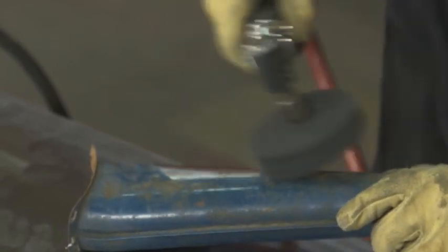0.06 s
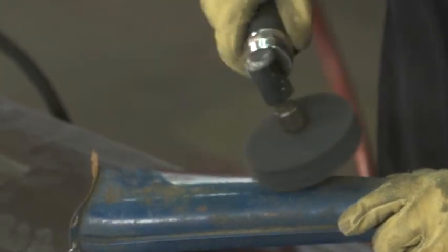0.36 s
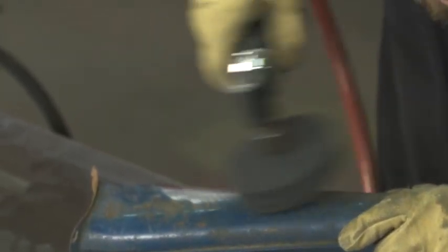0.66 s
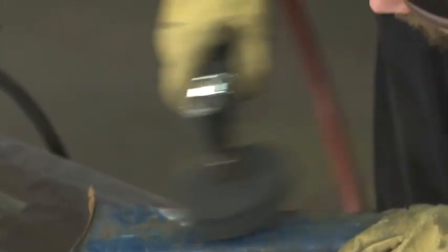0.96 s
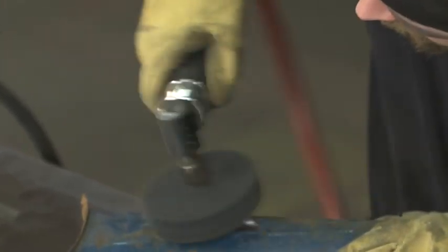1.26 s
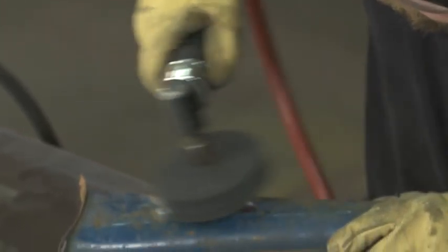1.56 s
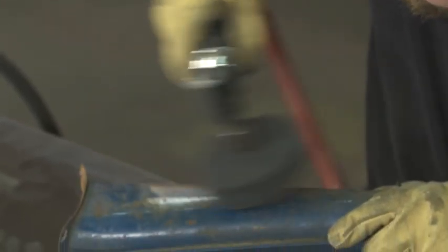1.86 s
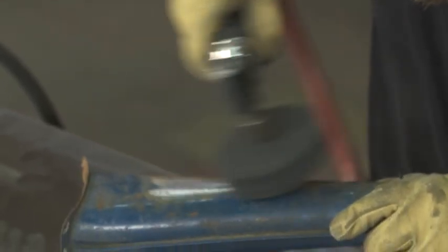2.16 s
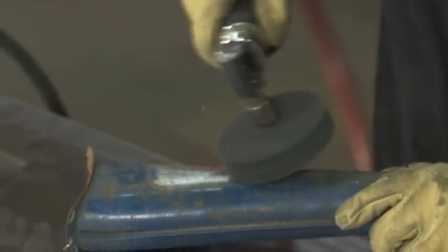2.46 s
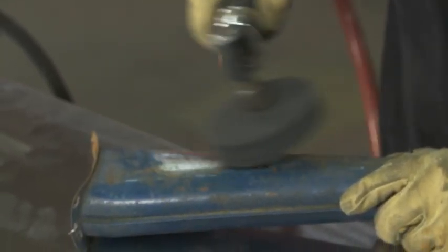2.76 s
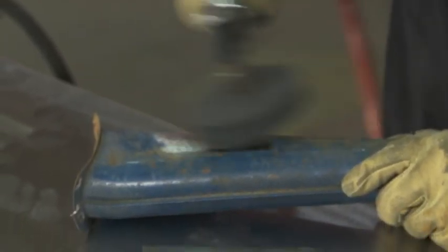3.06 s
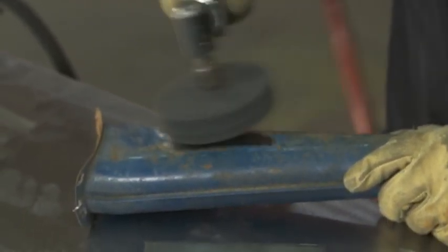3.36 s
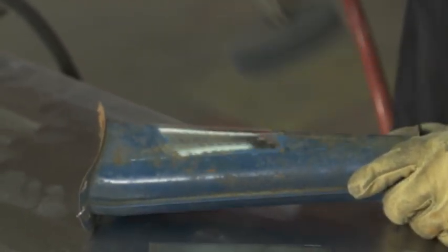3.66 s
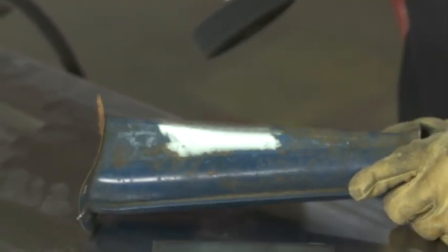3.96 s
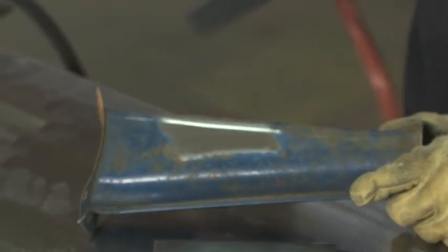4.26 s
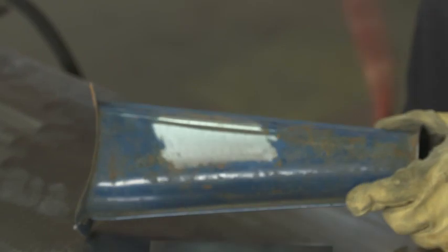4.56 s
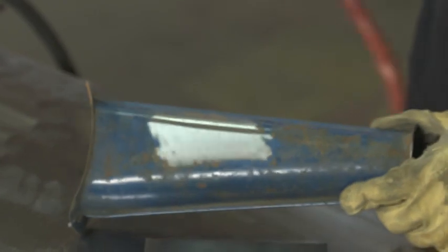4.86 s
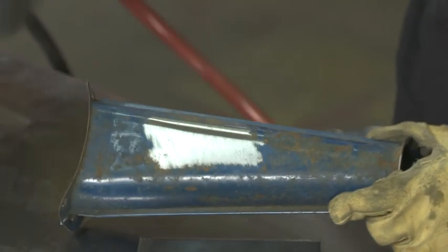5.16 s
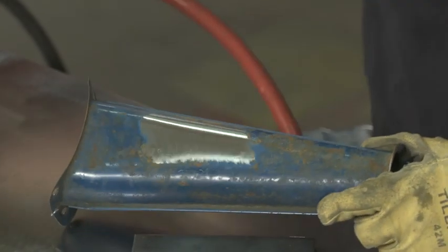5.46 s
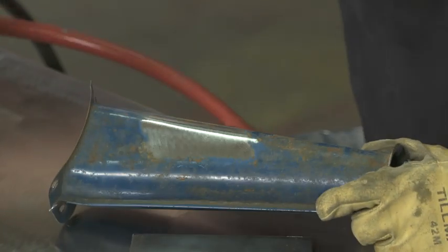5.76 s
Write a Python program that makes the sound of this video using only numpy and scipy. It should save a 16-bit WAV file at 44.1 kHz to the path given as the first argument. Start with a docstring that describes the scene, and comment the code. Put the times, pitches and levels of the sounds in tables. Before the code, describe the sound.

A pneumatic grinding disc rasps back and forth on hollow steel, then shuts off and coasts down, whirring and ticking.

```python
"""In a workshop, an air grinder strokes a stripping disc to and fro over a hollow sheet-steel part.
The disc's rim rubs the same bumps over the steel on every turn, so the steel rings, rasps and squeals.
The motor's vanes (small sliding blades) chop the air into a whine, and the used air hisses out.
The disc lifts, the trigger shuts the air, and the motor coasts down until its loose vanes flop one by one."""
import sys
import numpy as np
from scipy import signal
from scipy.fft import rfft, irfft, next_fast_len
from scipy.io import wavfile
from scipy.ndimage import uniform_filter1d

SR = 44100
rng = np.random.default_rng(int(sys.argv[2]) if len(sys.argv) > 2 else 0)


def generate_wav(sig):
    """Save sig (samples, or channels by samples) to the path in sys.argv[1] as 16-bit PCM at SR."""
    pcm = np.round(np.clip(np.atleast_2d(sig).T, -1, 1) * 32767).astype(np.int16)
    wavfile.write(sys.argv[1], SR, pcm)


N = 265921
T = np.arange(N) / SR
HZ = np.maximum(np.fft.rfftfreq(N, 1 / SR), 1)

# Levels in the tables are relative: the functions add their own gains.
# tone colours of the noises: f/Hz, level/dB
ROOM_COLOUR = [(15, -38.5), (25, 3.5), (394, -10), (462, 0), (978, -10), (1420, -4.5), (1630, -9),
               (4500, -21), (5420, -67.5), (11200, -22.5), (15000, -34)]  # the quiet workshop
HISS_COLOUR = [(2650, -55.5), (4500, -35), (5850, -1), (7000, 2), (7690, 4.5), (9590, -0.5), (12700, 5),
               (15100, 1), (15800, -15.5)]  # air leaving the motor
RUSH_COLOUR = [(25, -10.5), (100, -11.5), (300, -11.5), (520, -5), (720, -8.5), (1100, -2.5), (2500, -2),
               (4000, -4.5), (5000, -4), (7000, -13)]  # broad rush of air and scouring grit
LAST_AIR_COLOUR = [(2350, -26), (4000, -8), (5330, -22), (6710, -22), (7400, -11), (9150, -12), (11200, -4),
                   (12600, -8), (13700, -12), (15800, -19)]  # the last air leaking out
VANE_RUB_COLOUR = [(190, -19.5), (330, -9.5), (359, -7), (421, -13.5), (511, 0), (563, -1), (762, -14.5),
                   (1300, -7), (1850, -13.5), (2690, -11.5), (3310, -18), (5310, -18), (6000, -21.5),
                   (7800, -27), (13200, -120)]  # vanes rubbing the housing
BEARING_COLOUR = [(2940, -34), (5000, -18), (5890, 0), (6390, 1), (7000, 5.5), (7900, 3.5), (9620, -5),
                  (11000, 0), (13300, -13), (14900, -18), (15800, -23)]  # fizzing bearings
KNOCK_COLOUR = [(120, -43), (200, -8), (215, -11), (402, -8), (463, -2), (490, 1), (670, -6), (1530, -11.5),
                (1620, -17), (2380, -20.5), (3250, -25), (4710, -27.5), (6000, -36), (7800, -56),
                (13200, -120)]  # the low part of a vane's flop
VANE_TICK_COLOUR = [(2650, -43), (4500, -9), (6040, -17), (6740, -3), (7850, 1), (9440, -9), (11100, 6),
                    (12800, -10), (15800, -25)]  # its high part
# dry scrapes as the tool runs down: middle t/s, length/s, f/Hz, width/Hz, level/dB
DRY_SCRAPES = [(4.662, 0.044, 3827, 4000, -52.5), (4.82, .25, 3700, 1216, -59),
               (5.168, .3, 3780, 1390, -65.5), (5.384, 0.12, 3170, 700, -60.5),
               (5.524, 0.014, 5140, 2500, -54), (5.547, 0.0097, 8200, 4950, -53)]
# single vane flops, the hard ones and the last slow ones: t/s, level/dB, treble/dB
VANE_FLOPS = [(4.514, -39, -22), (4.6, -31, -14), (4.825, -42, 1), (4.95, -42, 7), (5.025, -49, 14),
              (5.401, -38, -18), (5.434, -39, -18), (5.497, -35.5, -11), (5.562, -37.5, -7),
              (5.594, -41, -5), (5.637, -40.5, -11), (5.662, -38, -2), (5.7, -38, -18), (5.77, -38, -28),
              (5.84, -40, -8), (5.887, -38, 0.5), (5.914, -42, -19), (5.99, -40, -18), (6.018, -37, -3)]
# strength of the exhaust hiss: t/s, level/dB
HISS_LEVEL = [(0, -24.5), (.8, -26.5), (1.5, -27), (2.3, -26), (3.64, -27.5)]
# the motor's weaker overtones: multiple of the vane rate, level/dB
OVERTONES = [(3, -6.5), (4, -2.5), (5, -3.5), (6, -2.5), (7, -7.5), (8, -13.5), (9, -6), (11, -10.5)]
# shake of the unbalanced disc: multiple of the spin rate, level/dB
DISC_SHAKE = [(1, -7), (2, 0), (3, -4.5), (6, -5.5), (7, -1.5)]
# turns per second, dropping as the hand leans on the tool: t/s, f/Hz
SPIN_RATE = [(0.0, 108.6), (0.19, 109.6), (0.49, 113.7), (0.79, 105.7), (0.92, 103.2), (1.0, 102.1),
             (1.16, 97.64), (1.34, 95.75), (1.44, 99.75), (1.62, 105.4), (1.86, 111.1), (2.08, 108.1),
             (2.38, 107.2), (2.58, 109.1), (2.83, 107.1), (3.06, 102), (3.35, 97.9), (3.6, 98.74)]
# each stroke lingers at the part's hollow end, which rings and drones:
# t/s, stay/s, ring at the end/dB, ring in between/dB, drone/dB, extra clang/dB, extra rasp and shrill/dB
HAND_STROKES = [(0.081, 0.11, -34.5, -23, -33, -1.0, -1), (0.37, 0.19, -18.5, -28.5, -32.5, -2, 0),
                (0.625, 0.11, -21, -20.5, -32, -1.0, -0.5), (0.895, 0.069, -17.5, -17, -29.5, -1.0, -2),
                (1.153, 0.119, -22, -23.5, -33.5, -1, -3), (1.413, 0.094, -18.5, -25.5, -30.5, 0.5, -1.5),
                (1.669, 0.12, -13.5, -14, -30.5, 0, 1.0), (1.921, 0.16, -9.5, -26.5, -26.5, -2, 0.5),
                (2.205, 0.13, -14, -13, -28.5, 0, -1), (2.485, 0.16, -13.5, -21, -27.5, -0.0, 1),
                (2.735, 0.15, -15, -17.5, -29.5, -1.5, -1), (2.992, 0.13, -13.5, -18.5, -32.5, 1.5, 0.5),
                (3.261, 0.11, -15, -22, -30.5, 0.5, -1), (3.514, 0.083, -16.5, -28, -31.5, 1.5, 0)]
# the rim catches and the steel sings one note: middle t/s, length/s, f/Hz, level/dB
RIM_SQUEALS = [(0.042, 0.048, 3840, -26), (.17, 0.38, 2520, -27), (0.66, .06, 2513, -25),
               (0.96, .07, 2250, -22.5), (1.236, 0.052, 3780, -27), (0.477, 0.11, 4040, -29),
               (1.806, 0.13, 2525, -24), (1.987, 0.052, 2523, -22), (2.273, 0.048, 2530, -22.5),
               (2.82, 0.027, 3800, -22), (2.887, 0.05, 3758, -28), (3.2, 0.026, 3807, -24.5),
               (3.34, 0.042, 3733, -23.5), (3.412, 0.076, 1752, -22), (3.45, 0.059, 3716, -25.5),
               (3.53, 0.055, 4490, -30.5), (3.579, 0.031, 3740, -21)]
# the steel's modes (the pitches it likes to ring at), low to high: f/Hz, width/Hz, level/dB
RING_MODES = [(851.6, 52, 0.5), (982, 34, -3.5), (1086, 85, 3), (1213, 106, -13)]
CLANG_MODES = [(1427, 160, 1), (1735, 495, -3.5)]
RASP_MODES = [(2221, 160, -1.5), (2360, 190, -9), (2509, 98, -4.5), (2800, 270, -4), (3183, 520, -14.5)]
SHRILL_MODES = [(3800, 400, 2), (4130, 1500, -5)]

LIFT_S, SHUT_S = 3.61, 3.662  # the disc leaves the steel; the trigger shuts the air
FREE_HZ, VANE_MULTIPLE = 105.5, 5.2  # spin rate just after the lift; vane pulses per turn


def undb(db):
    """Turn decibels into a gain."""
    return 10 ** (np.asarray(db) / 20)


def unit(x):
    """Scale to an average strength (rms) of 1."""
    return x / np.sqrt(np.mean(x ** 2))


def curves(table):
    """The columns of a timed table, one value per sample."""
    s, *columns = np.transpose(table)
    return [np.interp(T, s, c) for c in columns]


def noise():
    """White noise."""
    return rng.standard_normal(N)


def grit(spread_db):
    """Gritty noise: many tiny grains, a few much louder than the rest."""
    return unit(noise() * undb(spread_db * np.minimum(rng.exponential(size=N), 8)))


def walk(rate):
    """A random wander of size about 1, changing course rate times a second."""
    steps = rng.standard_normal(2048)
    return 1.248 * np.interp(T * rate, np.arange(len(steps)), steps)


def until(s, fade_s):
    """Stay at 1 until time s, then die away."""
    return np.exp(-np.maximum(T - s, 0) / fade_s)


def swell(s, length_s):
    """A flat-topped swell around time s."""
    return np.exp(-np.minimum(np.abs(2 * (T - s) / length_s), 5) ** 4)


def shape(x, gain):
    """Filter with a gain for each frequency, ringing only after a sound and never before it."""
    log_gain = np.interp(np.fft.rfftfreq(8192, 1 / SR), HZ, np.log(gain + 1e-5))
    fold = np.r_[1, np.full(4095, 2), 1, np.zeros(4095)]
    response = irfft(np.exp(rfft(irfft(log_gain) * fold)))[:4096]
    return signal.oaconvolve(x, response)[:N]


def colour(x, points):
    """Give a sound the tone colour in a table, at strength 1."""
    hz, db = np.transpose(points)
    return unit(shape(x, undb(np.interp(np.log(HZ), np.log(hz), db))))


def band(x, hz, width):
    """One resonance, with gain 1 at its centre."""
    return shape(x, 1 / np.hypot(1, (HZ ** 2 - hz ** 2) / (HZ * width)))


def resonate(x, modes):
    """Ring a set of modes and hold the result at an even level."""
    gain = sum(undb(db) / (1 + ((HZ ** 2 - hz ** 2) / (HZ * width)) ** 2) for hz, width, db in modes)
    ringing = shape(x, gain)
    return ringing / np.sqrt(uniform_filter1d(ringing ** 2, size=2600) + 1e-12)


def cavity(hz, centre_hz=502.4, half_width_hz=23):
    """How near a tone is (0-1) to the pitch that the air in the hollow part boosts."""
    return 1 / (1 + ((hz - centre_hz) / half_width_hz) ** 2)


def at_hollow_end():
    """How near the disc is (0-1) to the hollow end of its stroke."""
    return np.minimum(sum(swell(s, stay_s) for s, stay_s, *_ in HAND_STROKES), 1)


def stroke_angle():
    """The hand's to and fro in radians, one cycle per stroke."""
    return 2 * np.pi * np.interp(T, [row[0] for row in HAND_STROKES], np.arange(len(HAND_STROKES)))


def spin_hz(sway_hz=0.542, run_up_s=.018, coast_from_s=3.645, slowing_s=.59):
    """Turns per second: held back by the work, freed by the lift, then slowed ever more gently by drag."""
    working = curves(SPIN_RATE)[0] + sway_hz * np.sin(stroke_angle())
    free = FREE_HZ / (1 + np.maximum(T - coast_from_s, 0) / slowing_s) ** 1.4
    lifted = np.clip((T - LIFT_S) / run_up_s + .5, 0, 1)
    return working + (free - working) * lifted


def room_tone(level_db=-60.5):
    """The quiet, steady noise of the workshop."""
    return undb(level_db) * colour(noise(), ROOM_COLOUR)


def wall_echo(x, echo_db=-19, decay_s=.5):
    """The walls send back a short, faint tail."""
    tail = (noise() * undb(-60 * T / decay_s) * (T > .006))[:SR]
    return undb(echo_db) * signal.fftconvolve(x, tail / np.linalg.norm(tail))[:N]


def scrapes():
    """Dry metal rubs briefly as the tool runs down."""
    return sum(undb(db) * swell(s, length) * resonate(grit(spread_db=6.5), [(hz, width, 0)])
               for s, length, hz, width, db in DRY_SCRAPES)


def rattle(start_s=4.76, gap_s=.0212, stretch_s=.000346, count=25, treble_db=-13):
    """Loose vanes rattle ever more slowly as the motor slows. Rows: t/s, level/dB, treble/dB."""
    k = np.arange(count)
    ages = k * (gap_s + stretch_s * k / 2)
    levels = -38 - 0.8 * ages + 0.2 * rng.standard_normal(count)
    return [(start_s + age, db, treble_db) for age, db in zip(ages, levels)]


def flops(knock_db=-4, tick_db=-11, rise_s=0.0012, knock_s=0.0067, tick_s=0.0087):
    """Each loose vane slides out and hits the housing with a short, gritty knock."""
    knock, tick = np.zeros(N), np.zeros(N)
    for s, db, treble_db in rattle() + list(VANE_FLOPS):
        span = slice(int(s * SR), int(s * SR) + SR // 10)
        age = T[span] - T[span][0]
        landing = undb(db) * (1 - np.exp(-age / rise_s))
        knock[span] += landing * undb(knock_db) * np.exp(-age / knock_s)
        tick[span] += landing * undb(treble_db + tick_db) * np.exp(-age / tick_s)
    return knock * colour(noise(), KNOCK_COLOUR) + tick * colour(grit(spread_db=5.5), VANE_TICK_COLOUR)


def housing_bumps(rotor, size=256):
    """The vanes pass the same rough wall on every turn; the pattern shifts as they settle."""
    place = rotor / (2 * np.pi) % 1 * size
    shares = [walk(7) for _ in range(3)]
    bumps = sum(share * np.interp(place, np.arange(size), rng.standard_normal(size)) for share in shares)
    return unit(bumps / np.linalg.norm(shares, axis=0))


def coasting(angle, rub_db=-33, fizz_db=-47, leak_db=-51):
    """With the trigger shut, the last air leaks out, the vanes rub and the bearings fizz, all fading."""
    rotor = VANE_MULTIPLE * angle / 5
    age = np.maximum(T - SHUT_S, 0)
    whirr = undb(1) * colour(housing_bumps(rotor), VANE_RUB_COLOUR) * until(4.54, 0.25)
    dry_rub = colour(grit(spread_db=3), VANE_RUB_COLOUR)
    rub = undb(rub_db - 18 * age) * (whirr + dry_rub)
    leaking = until(4.29, 0.091)
    leak = undb(leak_db) * leaking * colour(noise(), LAST_AIR_COLOUR)
    fizz_gain = undb(fizz_db - 14 * age + 0.5 * walk(60)) * (1 - leaking)
    fizz = fizz_gain * colour(grit(spread_db=3.5), BEARING_COLOUR)
    throb = 1 + 0.28 * np.cos(2 * rotor)
    return (throb * (rub + fizz) + leak) * (1 - until(SHUT_S, 0.0055))


def exhaust(angle, at_end, rush_db=-25, stereo_db=-21, chop=0.12):
    """Air spits out, pulsed by the vanes, over a broad scouring rush; the trigger cuts both off."""
    flow_db = curves(HISS_LEVEL)[0] - 2 * at_end + 0.7 * walk(170)
    flow = undb(flow_db) * (1 + chop * np.cos(VANE_MULTIPLE * angle)) * until(SHUT_S, 0.0019)
    hiss = colour(grit(spread_db=2), HISS_COLOUR)
    # the treble dips a little at the hollow end of each stroke
    hiss = unit(hiss - 0.052 * (2 * at_end - 1) * band(hiss, hz=9150, width=2700))
    stereo = undb(stereo_db) * colour(noise(), HISS_COLOUR) * np.array([[1], [-1]])
    rush = undb(rush_db + walk(25.07)) * colour(noise(), RUSH_COLOUR) * until(SHUT_S, .009)
    return flow * (hiss + stereo) + rush


def motor(angle, speed, whistle_db=-43, jitter_rad=.5):
    """The vanes chop the air into a whine that falls and fades as the motor coasts."""
    vane, vane_hz = VANE_MULTIPLE * angle, VANE_MULTIPLE * speed
    on_steel, air_on = until(LIFT_S, 0.015), until(SHUT_S, 0.0039)
    octaves = (1 - on_steel) * np.log2(speed / FREE_HZ)  # goes below zero as the motor slows
    driven_db = -28 + 5.5 * cavity(vane_hz) + 2.1 * walk(11)
    coasting_db = -18 + 18 * octaves + 6.5 * cavity(vane_hz)
    first = undb(air_on * driven_db + (1 - air_on) * coasting_db) * np.sin(vane) * until(4.44, 0.17)
    second = undb(-27 + 11 * octaves + 6.5 * cavity(2 * vane_hz)) * np.sin(2 * vane)
    overtones = sum(undb(db + 2.5 * walk(40)) * np.sin(k * vane + jitter_rad * walk(130))
                    for k, db in OVERTONES)
    overtones *= undb(-40 + 9 * octaves)
    # the housing whistles as one high overtone slides through its resonance
    whistle = undb(whistle_db) * band(np.sin(9 * vane + jitter_rad * walk(130)), hz=2830, width=220)
    upper = undb(5 * air_on - 12 * on_steel) * (second + overtones + whistle) * until(4.41, .22)
    return np.sqrt(2) * (first * (1 + 0.24 * walk(70)) + upper * (1 + .15 * walk(90)))


def disc(angle, speed, at_end, between_db=-42, cavity_db=15):
    """The unbalanced disc hums, louder with speed; its lobes, four and five a turn, drone on the steel."""
    hum_db = -38.5 - 5 * at_end + 26 * np.log2(speed / FREE_HZ)
    hum = sum(undb(hum_db + db + 2 * walk(12)) * np.sin(k * angle + rng.uniform(0, 2 * np.pi))
              for k, db in DISC_SHAKE)
    _, _, _, end_db, _, _ = curves(HAND_STROKES)
    drone_db = at_end * end_db + (1 - at_end) * between_db
    four = undb(drone_db + 1) * np.sin(4 * angle + .3 * walk(14))
    five = undb(drone_db - 7 + cavity_db * cavity(5 * speed)) * np.sin(5 * angle + .5 * walk(14))
    return np.sqrt(2) * (hum + (four + five) * until(LIFT_S, 0.013))


def squeals(angle, throb=.35, waver_rad=.45):
    """The rim sticks and slips, so one note sings for a moment, throbbing as the disc turns."""
    tones = sum(undb(db) * swell(s, length) * np.sin(2 * np.pi * hz * T + waver_rad * walk(150))
                for s, length, hz, db in RIM_SQUEALS)
    return np.sqrt(2) * tones * (1 + throb * np.cos(angle))


def rim_force(angle, wear=0.06, wear_rate=13, scatter=0.064):
    """The rim's bumps repeat every turn; the finer they are, the more wear changes their pattern."""
    force = np.zeros(N)
    for k in range(1, 49):
        phase = k * angle + scatter * k * rng.standard_normal()
        change = wear * k
        bump = (1 + change * walk(wear_rate)) * np.cos(phase) + change * walk(wear_rate) * np.sin(phase)
        force += bump / np.hypot(1, change)
    return unit(force)


def steel(angle, at_end, takeover_db=2.5):
    """Rim and grit ring the steel until the lift: low modes at the hollow end, high ones in between."""
    rim = rim_force(angle)
    scour = undb(-11) * grit(spread_db=5.5) * (1 + .45 * np.cos(angle))  # pressed on once a turn
    sweep = np.sin(stroke_angle()) ** 2  # 1 where the hand moves fastest
    _, end_db, between_db, _, extra_clang_db, bite_db = curves(HAND_STROKES)
    ring_db = -0.54 + at_end * end_db + (1 - at_end) * between_db - 3 * sweep
    clang_db = -25 + extra_clang_db + 1.8 * at_end + 2 * sweep + 1.8 * walk(21.92)
    rasp_db = -22 + bite_db - 3.5 * at_end + 2 * sweep + 0.9 * walk(21.92)
    shrill_db = -26 + bite_db - 4 * at_end + 0.5 * sweep + 1.7 * walk(21.92)
    ring = resonate(rim + undb(-9) * scour, RING_MODES)
    # at the hollow end, the middle of the ring gains on the pitches around it
    middle = band(ring, hz=1042, width=130)
    boost = undb(takeover_db * (at_end - .5))
    ring = undb(ring_db) * (middle * boost + (ring - middle) / boost)
    clang = undb(clang_db) * resonate(rim + scour, CLANG_MODES)
    rasp = undb(rasp_db) * resonate(rim + scour, RASP_MODES)
    shrill = undb(shrill_db) * resonate(rim + undb(1) * scour, SHRILL_MODES)
    return (ring + clang + rasp + shrill) * until(LIFT_S, 0.018)


def scene():
    """The spinning disc and the stroking hand drive the grinding, over the quiet of the workshop."""
    speed, at_end = spin_hz(), at_hollow_end()
    flutter = 1 + 0.001944 * walk(45)
    angle = 2 * np.pi * np.cumsum(speed * flutter) / SR
    grinding = steel(angle, at_end) + squeals(angle) + disc(angle, speed, at_end)
    tool = grinding + motor(angle, speed) + exhaust(angle, at_end) + coasting(angle) + flops() + scrapes()
    return tool + wall_echo(tool.mean(axis=0)) + room_tone()


def record(dry, ceiling=0.47, top_hz=15850):
    """Round off the tallest peaks and cut the highest treble."""
    rounded = dry / (1 + (dry / ceiling) ** 6) ** (1 / 6)
    return signal.sosfilt(signal.ellip(10, .1, 80, top_hz, fs=SR, output="sos"), rounded)


dry = scene()
out = record(dry)
generate_wav(out)
```